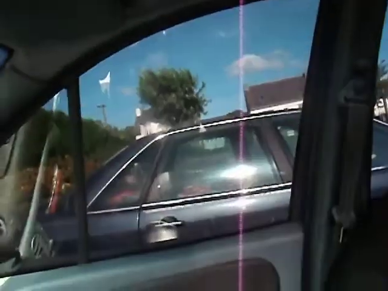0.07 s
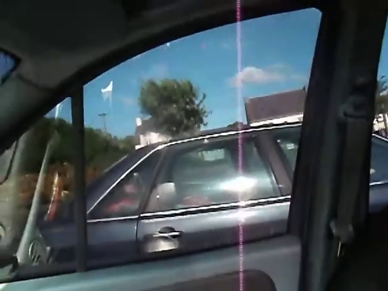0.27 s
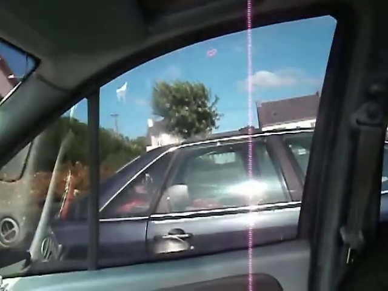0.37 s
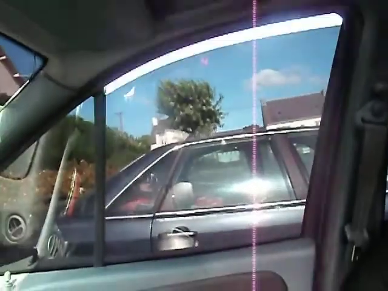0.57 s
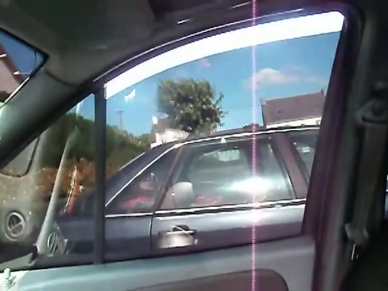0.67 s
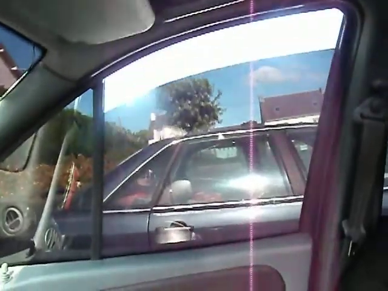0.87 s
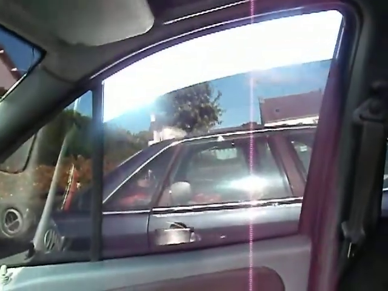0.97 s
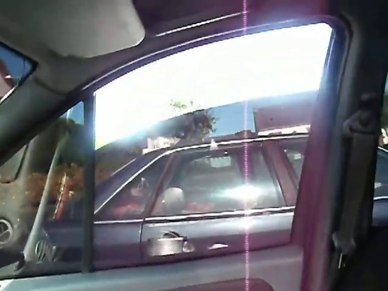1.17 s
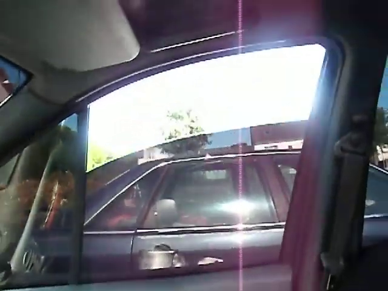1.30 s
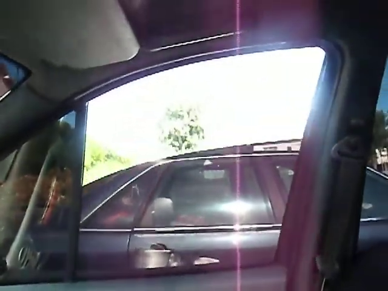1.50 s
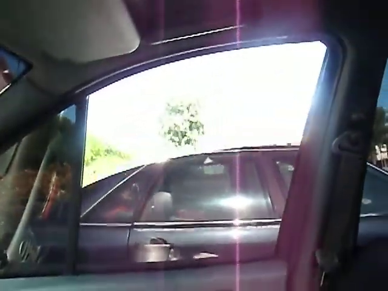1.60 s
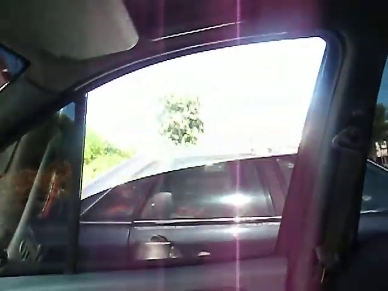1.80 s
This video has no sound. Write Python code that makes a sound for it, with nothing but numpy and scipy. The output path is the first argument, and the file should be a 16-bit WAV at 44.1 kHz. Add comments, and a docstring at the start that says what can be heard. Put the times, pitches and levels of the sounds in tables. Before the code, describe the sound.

A car power window winds down, heard close up inside the cabin over quiet outside noise and a faint thin whine. A switch clicks at 0.1 seconds. Around 0.25 the motor starts with a clunk and a loud, short squeak. From 0.5 to 0.7 the glass scrapes free of its seal, thumping the door. The motor whirrs on, with the glass hissing along its guides, until about 1.85 seconds.

```python
"""Inside a parked car, within reach of the door, on a small camera microphone with little treble.
Over quiet outside noise and a thin whine, a switch clicks and a power window starts to wind down.
The mechanism takes up its slack with a clunk and a squeak, the glass tugs free of its top seal and
shakes the door, then the motor whirrs on while the pane hisses along its rubber guides."""
import sys
import numpy as np
from scipy import signal
from scipy.fft import rfft, irfft
from scipy.io import wavfile
from scipy.ndimage import uniform_filter1d

SR = 44100
rng = np.random.default_rng(int(sys.argv[2]) if len(sys.argv) > 2 else 0)


def output_pcm(signal):
    """Save a mono or channel-first signal as 16-bit PCM at the path in sys.argv[1].

    Samples are clipped to [-1, 1] before scaling.
    """
    pcm = np.clip(np.atleast_2d(signal).T, -1, 1) * 32767
    wavfile.write(sys.argv[1], SR, np.round(pcm).astype(np.int16))


N = 81585

# outside noise as heard in the cabin (frequency [Hz], relative level [dB])
OUTSIDE_SPECTRUM = [(20, -1.5), (60, -1.5), (170, -11.5), (300, -6), (420, -11.5), (650, -9), (1050, -12),
                    (1500, -14.5), (3000, -23), (4500, -22), (5200, -24.5), (6000, -36)]
# modes of the plastic switch (frequency [Hz], level [dB], t60 [s])
SWITCH_MODES = [(1043, -19.5, 0.05), (1110, -22, 0.029), (810, -28, 0.042)]
# motor speed (time [s], speed [turns/s])
MOTOR_SPEED = [(.24, 55), (.36, 90), (.5, 76), (.68, 81.8), (.8, 83.8), (.9, 85.3), (1.02, 83.2), (1.2, 82),
               (1.4, 81.9), (1.54, 81.2), (1.7, 79.8), (1.85, 77.8)]
# harmonics of the hum (order [cycles/turn], relative level [dB])
HUM_ORDERS = [(1, -10), (2, -11.5), (3, 0), (4, 0), (5, -2.5), (6, -3.5), (7, -3.5), (8, -1), (9, -1.5),
              (10, -1), (11, -12), (12, -4), (13, -5.5), (14, -16)]
# gear clatter (frequency [Hz], relative level [dB])
GEAR_SPECTRUM = [(600, -16), (1000, -14.5), (1500, 1), (2400, -2), (3500, 2.5), (4600, -10), (6000, 10)]
# brush whirr (frequency [Hz], relative level [dB])
WHIRR_SPECTRUM = [(60, -14), (110, 4.5), (250, -0.5), (370, -13.5), (600, -5), (800, -4.5), (1200, -7.5),
                  (2000, -8), (3000, -11.5), (4000, -28)]
# the whirr under changing load (time [s], gain [dB])
WHIRR_LOAD = [(.3, 3), (.8, -2), (1.0, 1), (1.2, -1), (1.36, -2.5), (1.53, -0.5), (1.6, -0.5), (1.68, 0),
              (1.77, 1), (1.85, -3)]
# cabin boom (frequency [Hz], width [Hz], level [dB])
CABIN_MODES = [(24.3, 8, -41), (57.7, 9.2, -37.5)]
# hiss of the sliding glass (time [s], level [dB], centre [Hz])
HISS_PATH = [(.3, -53, 4211), (.4, -34, 4204), (.66, -34.5, 4109), (.8, -28, 4320), (.92, -30, 4286),
             (1.05, -27.5, 4362), (1.3, -26, 4415), (1.45, -28.5, 4258), (1.56, -30.5, 4128),
             (1.72, -32, 3968), (1.77, -31.5, 3897), (1.85, -31.5, 3820)]
# bands of that hiss (frequency [x centre], width [x mean centre], relative level [dB])
HISS_BANDS = [(.71, 0.19, -16), (0.871, 0.23, -4), (1.04, 0.18, 0), (1.19, 0.17, -5)]
# knocks of gears and glass in the door
# (time [s], hold [s], body level [dB], panel level [dB], rattle level [dB], panel pitch [Hz])
KNOCKS = [(0.2329, .018, -30, -15.5, -20.5, 1050), (.272, 0.015, -31.5, -31.5, -27, 1100),
          (0.288, 0.016, -27.5, -23, -21, 1100), (0.323, 0.014, -29, -23.5, -38, 1100),
          (.354, 0.0056, -24, -17.5, -47.5, 460), (0.369, 0.0057, -23.5, -23, -25, 1200),
          (0.395, .014, -37.5, -36, -30, 800), (0.429, .014, -30.5, -35, -29, 800),
          (0.55, 0.0054, -25.5, -16, -16, 780), (0.568, 0.006, -22.5, -15.5, -29, 730),
          (0.586, 0.0053, -22, -29.5, -32.5, 620), (0.663, 0.029, -28, -24, -51, 771.6),
          (0.735, 0.032, -30.5, -43, -44, 300), (0.937, 0.012, -28.5, -26, -52, 569.5)]
# ringing of the door panel (frequency [Hz], width [Hz], relative level [dB])
DOOR_MODES = [(681, 30, -5), (771, 30, 0.5), (1035, 40, -3), (1139, 40, -4), (1426, 80, -6.5)]
# door body, panel and loose parts when struck (frequency [Hz], relative level [dB])
BODY_SPECTRUM = [(60, -5), (130, 3.5), (280, 4), (450, -5.5), (600, -1.5), (1000, -20.5)]
PANEL_SPECTRUM = [(250, -14.5), (550, 2.5), (780, 1), (1100, -12), (1450, 4), (2000, -12), (3000, -29)]
RATTLE_SPECTRUM = [(700, -34), (1400, -6), (2100, 1.5), (2700, -1), (3600, 0), (4300, 2.5), (5200, -5),
                   (6000, -15.5)]
# thumps of the door shell (time [s], frequency [Hz], level [dB], t60 [s])
THUMPS = [(.235, 159, -28.5, .15), (0.259, 43, -16, 0.24), (0.281, 87.7, -16, .2), (0.366, 131, -22, 0.33),
          (.468, 58.4, -18.5, 0.31), (.505, 27.3, -15, 0.6), (0.528, 116.7, -19.5, 0.22),
          (0.566, 79.2, -16, 0.31), (0.59, 137, -7.5, 0.12), (0.624, 87.4, -18, .25),
          (0.722, 79.4, -19.5, 0.19), (1.267, 54.5, -25, .12), (1.596, 179, -30, .15)]
# stick-slip squeaks (time [s], length [s], pitch [Hz], level [dB])
SQUEAKS = [(0.251, 0.02, 3192, -1.5), (0.271, 0.056, 3163, -22), (1.114, 0.024, 3590, -25.5)]
# rubber dragging on the glass (time [s], length [s], level [dB])
SCRAPES = [(0.489, 0.028, -18.5), (0.512, 0.036, -21.5), (0.571, 0.049, -26), (1.76, .03, -28)]
# tone of that rubber (frequency [Hz], relative level [dB])
SCRAPE_SPECTRUM = [(500, 2.5), (1500, 1), (2600, 2), (3600, 7), (4400, 8), (5200, 5.5), (6000, -3.5)]


def undb(db):
    return 10 ** (np.asarray(db) / 20)


def unit(x):
    return x / np.sqrt(np.mean(x ** 2))


def curve(rows, t, column=1):
    """One column of a table, joined by straight lines in time."""
    rows = np.array(rows)
    return np.interp(t, rows[:, 0], rows[:, column])


def colour(x, spectrum):
    """Shape a sound by (Hz, dB) points, falling away above the last; rms 1."""
    hz, db = np.array(spectrum).T
    f = np.maximum(np.fft.rfftfreq(N, 1 / SR), 1)
    gain_db = np.interp(np.log(f), np.log(hz), db) - 20 * np.maximum(np.log(f / hz[-1]), 0)
    return unit(irfft(rfft(x) * undb(gain_db), N))


def resonance(hz, width):
    """Noise ringing in one resonance, whose centre may move; rms 1."""
    f = np.fft.fftfreq(N, 1 / SR)
    white = rng.standard_normal(N) + 1j * rng.standard_normal(N)
    envelope = np.fft.ifft(np.fft.fft(white) / (1 + (f / width * 1.26) ** 2))
    carrier = np.exp(2j * np.pi * np.cumsum(hz * np.ones(N)) / SR)
    return unit((envelope * carrier).real)


def wander(rate_hz):
    """Smooth random drift; rms 1."""
    f = np.fft.rfftfreq(N, 1 / SR)
    return unit(irfft(rfft(rng.standard_normal(N)) * np.exp(-(f / rate_hz) ** 2) * (f > 0), N))


def grit(spectrum, rough_db):
    """Noise broken into tiny uneven slips."""
    return colour(rng.standard_normal(N) * undb(rough_db * wander(450)), spectrum)


def steady(x, window=900):
    """Even out the slow swells of a noise and round its tallest spikes; rms 1."""
    local_rms = np.sqrt(uniform_filter1d(x ** 2, size=window) + 1e-9)
    return unit(np.tanh(x / local_rms))


def decay(age, t60):
    """Full level until age 0, then down 60 dB every t60 seconds."""
    return np.exp(-np.log(1000) * np.maximum(age, 0) / t60)


def ring(t, start, hz, db, t60, attack_s=.003):
    """One damped mode set going by a soft push."""
    age = np.maximum(t - start, 0)
    return undb(db) * np.sin(2 * np.pi * hz * age) * np.minimum(age / attack_s, 1) * decay(age, t60)


def running(t, on_s=.22, rise_s=.041):
    """The drive comes up to strength after switching on."""
    return np.clip((t - on_s) / rise_s, 0, 1)


def cabin_ambience(t, outside_db=-36, whine_db=-48, whine_hz=4829):
    """Quiet outside noise and a thin steady whine fill the car."""
    outside = colour(rng.standard_normal(N), OUTSIDE_SPECTRUM)
    whine = np.sqrt(2) * np.sin(2 * np.pi * whine_hz * t)
    return undb(outside_db) * outside + undb(whine_db) * whine


def switch_click(t, start=.078, snap_s=.0023, tick_db=-26):
    """Light plastic ticks twice as the contact snaps over, and rings briefly."""
    envelope = sum((t > at) * decay(t - at, t60=.074) for at in (start, start + snap_s)) / 2
    ticks = undb(tick_db) * envelope * grit(RATTLE_SPECTRUM, rough_db=7)
    return ticks + sum(ring(t, start, *mode) for mode in SWITCH_MODES)


def motor_hum(speed, turns, skin_hz=674, skin_width_hz=26, skin_db=5.5):
    """Harmonics of the turn rate, reinforced near one pitch by the door skin; rms 1."""
    hum = np.zeros(N)
    for order, db in HUM_ORDERS:
        lift_db = skin_db / (1 + (2 * (order * speed - skin_hz) / skin_width_hz) ** 2)
        level = undb(db + lift_db + 2.5 * wander(3))
        hum += level * np.sin(2 * np.pi * (order * turns + rng.random()))
    return unit(hum)


def window_motor(t, hum_db=-38.5, gear_db=-34.5, whirr_db=-36.5):
    """Hum, a gear clatter that repeats each turn, brush whirr and the cabin booming along."""
    speed = curve(MOTOR_SPEED, t)
    turns = np.cumsum(speed * (1 + .002 * wander(14))) / SR
    hum = undb(hum_db) * motor_hum(speed, turns)
    teeth = rng.standard_normal(256)
    clatter = np.interp(turns % 1, np.linspace(0, 1, len(teeth)), teeth)
    gears = undb(gear_db) * colour(clatter, GEAR_SPECTRUM)
    brushes = rng.standard_normal(N) * (1 + .5 * np.sin(2 * np.pi * turns))
    whirr = undb(whirr_db + curve(WHIRR_LOAD, t)) * colour(brushes, WHIRR_SPECTRUM)
    boom = sum(undb(db) * steady(resonance(hz, width), window=12000) for hz, width, db in CABIN_MODES)
    return running(t) * (hum + gears + whirr + boom)


def glass_hiss(t):
    """The pane rubs along its guides: a fluttering hiss, brightest in mid travel."""
    centre = curve(HISS_PATH, t, column=2)
    hiss = sum(undb(db) * resonance(ratio * centre, width * centre.mean())
               for ratio, width, db in HISS_BANDS)
    flutter_db = .78 * wander(30) + wander(350)
    return running(t) * unit(hiss) * undb(curve(HISS_PATH, t) + flutter_db)


def door_knocks(t, attack_s=.0035, ring_db=2.5, focus_db=3):
    """Each knock chatters briefly, then dies away in the door body, its panel and the loose parts."""
    modes = unit(sum(undb(db) * resonance(hz, width) for hz, width, db in DOOR_MODES))
    panel = unit(grit(PANEL_SPECTRUM, rough_db=1) + undb(ring_db) * modes)
    body = steady(colour(rng.standard_normal(N), BODY_SPECTRUM))
    rattle = steady(grit(RATTLE_SPECTRUM, rough_db=2.5))
    out = np.zeros(N)
    for start, hold, body_db, panel_db, rattle_db, hz in KNOCKS:
        age = t - start
        attack = np.clip(age / attack_s, 0, 1)
        struck_panel = steady(panel + undb(focus_db) * resonance(hz, width=.3 * hz))
        out += undb(body_db) * body * attack * decay(age - hold, t60=.13)
        out += undb(panel_db) * struck_panel * attack * decay(age - hold, t60=.088)
        out += undb(rattle_db) * rattle * attack * decay(age - hold, t60=.098)
    return out


def door_thumps(t):
    """Low damped swings of the door shell."""
    return sum(ring(t, *thump) for thump in THUMPS)


def squeaks(t, attack_s=.003, release_s=.0063, sag_hz_per_s=3400, fade_db_per_s=139.5):
    """Stick-slip locks onto one note that sags a little."""
    out = np.zeros(N)
    for start, length, hz, db in SQUEAKS:
        age = np.clip(t - start, 0, length)
        envelope = np.clip(np.minimum(age / attack_s, (length - age) / release_s), 0, 1)
        pitch = hz - sag_hz_per_s * age + 12 * wander(590)
        out += undb(db - fade_db_per_s * age) * envelope * np.sin(2 * np.pi * np.cumsum(pitch) / SR)
    return out


def seal_scrapes(t):
    """Rubber drags on the glass and lets go in short gritty swells."""
    swells = np.zeros(N)
    for start, length, db in SCRAPES:
        progress = np.clip((t - start) / length, 0, 1)
        swells += undb(db) * np.sqrt(np.abs(np.sin(np.pi * progress)))
    return swells * grit(SCRAPE_SPECTRUM, rough_db=2)


def scene():
    """Everything that reaches the microphone in the cabin, in mono."""
    t = np.arange(N) / SR
    mix = cabin_ambience(t) + switch_click(t) + window_motor(t) + glass_hiss(t)
    mix += door_knocks(t) + door_thumps(t) + squeaks(t) + seal_scrapes(t)
    return mix[None]


def record(dry, edge_hz=5043, stop_hz=6360, overload=.7, top_hz=15800):
    """The camera microphone loses the treble and overloads on the loudest squeak."""
    f = np.fft.rfftfreq(N, 1 / SR)
    roll_off = 1 / np.sqrt(1 + (f / edge_hz) ** 13)
    treble_cut = np.clip((stop_hz - f) / 900, 0, 1) ** 1.5
    dulled = irfft(rfft(dry) * roll_off * treble_cut, N)
    clipped = np.clip(dulled, -overload, overload)
    return signal.sosfilt(signal.ellip(10, .2, 80, top_hz, fs=SR, output="sos"), clipped)


dry = scene()
out = record(dry)
output_pcm(out)
```